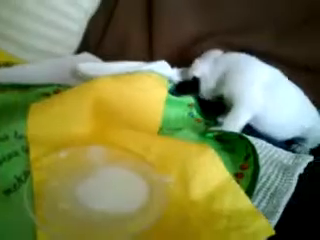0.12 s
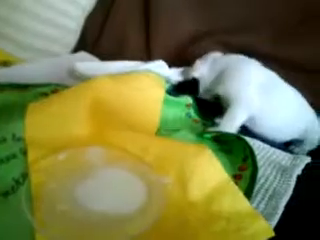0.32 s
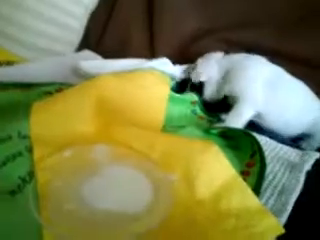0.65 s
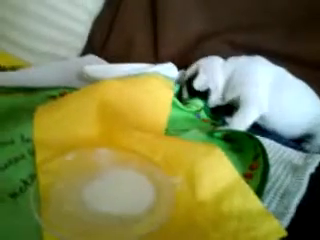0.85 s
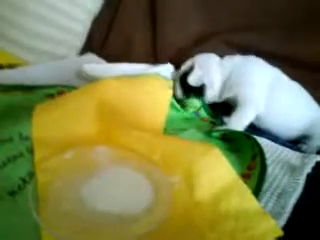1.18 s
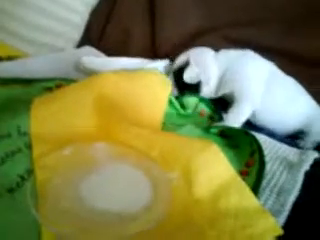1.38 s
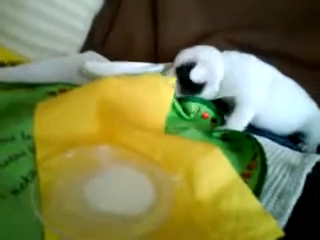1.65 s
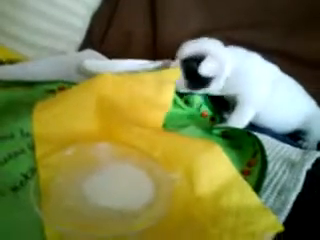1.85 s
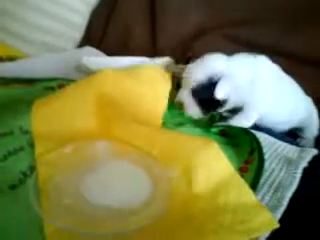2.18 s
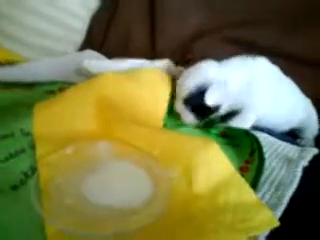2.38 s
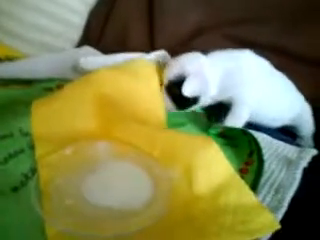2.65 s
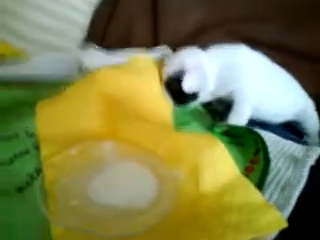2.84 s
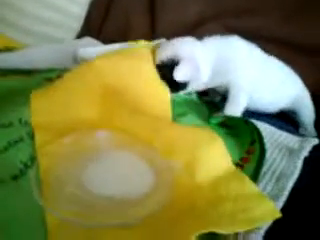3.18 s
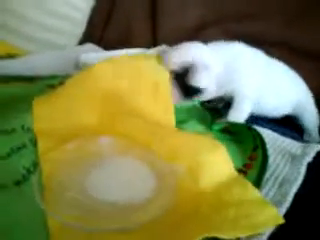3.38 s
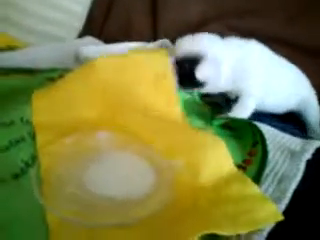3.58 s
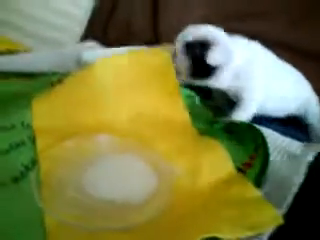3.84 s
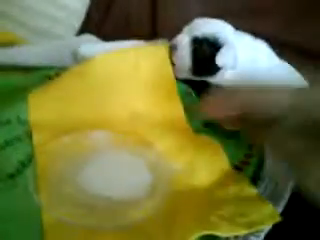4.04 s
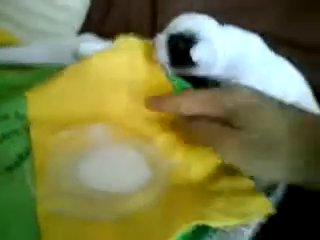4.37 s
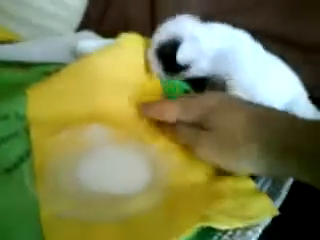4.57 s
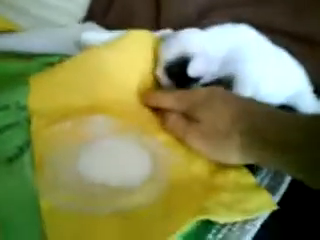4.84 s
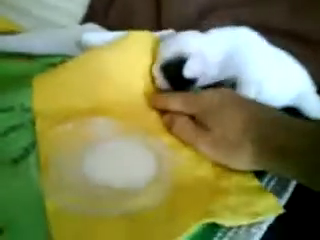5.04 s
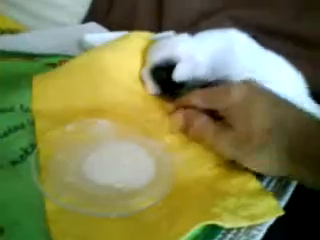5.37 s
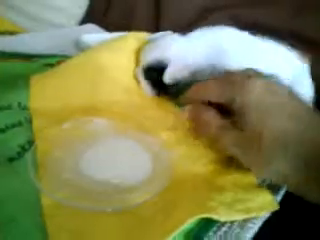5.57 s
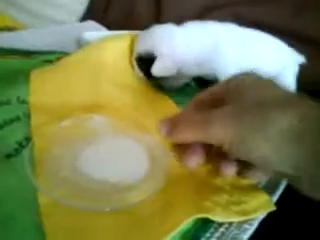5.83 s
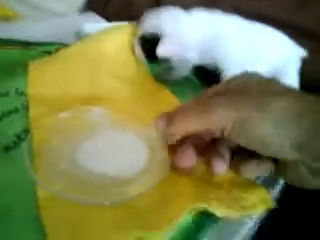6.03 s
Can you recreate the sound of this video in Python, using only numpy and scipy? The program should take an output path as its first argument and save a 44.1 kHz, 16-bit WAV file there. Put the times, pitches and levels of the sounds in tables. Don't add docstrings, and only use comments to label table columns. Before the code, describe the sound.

Close handling knocks, ticks and scrapes over soft room hiss, with a distant kitten's short squeal, trembling descending mew and faint whimpers.

```python
import sys
import numpy as np
from scipy import signal
from scipy.fft import rfft, irfft, next_fast_len
from scipy.io import wavfile
from scipy.ndimage import map_coordinates

SR = 44100
rng = np.random.default_rng(int(sys.argv[2]) if len(sys.argv) > 2 else 0)


def attenuation_scalar(level_db):
    decades = np.asarray(level_db, float) / 20
    return 10 ** decades


def digitize_waveform(pressure):
    field = np.atleast_2d(pressure).T
    bounded = np.clip(field, -1, 1)
    quanta = np.round(bounded * 32767).astype(np.int16)
    wavfile.write(sys.argv[1], SR, quanta)


N = 274081


def unit(x):
    return x / np.sqrt(np.mean(x ** 2) + 1e-20)


def along(points, hz):
    f, v = np.transpose(points)
    return np.interp(np.log(hz + 1), np.log(f + 1), v)


def curves(rows):
    s, *columns = np.transpose(rows)
    return [np.interp(np.arange(N) / SR, s, column) for column in columns]


def wobble(rate):
    knots = rng.standard_normal(int(N * rate / SR) + 4)
    return map_coordinates(knots, [np.arange(N) * rate / SR])


def filtered(x, response):
    m = next_fast_len(len(x) + 8192)
    return irfft(rfft(x, m) * response(np.fft.rfftfreq(m, 1 / SR)), m)[:len(x)]


def resonance(centre_hz, width_hz):
    return lambda f: 1j * f * width_hz / (centre_hz ** 2 - f * f + 1j * f * width_hz)


def noise(response):
    return unit(filtered(rng.standard_normal(N), response))


def add(track, s, sound):
    spot = track[round(s * SR):][:len(sound)]
    spot += sound[:len(spot)]


def swell(length, rise):
    return np.sin(np.pi * np.linspace(0, 1, round(length * SR)) ** rise)


def knocks(events, cycles, gain_db):
    out = np.zeros(N)
    t = np.arange(SR // 12) / SR
    for (s, db, hz), luck in zip(events, rng.standard_normal((len(events), 2))):
        u = t * hz / (cycles * attenuation_scalar(luck[0]))
        envelope = u * np.exp(1 - u)
        add(out, s, np.sign(luck[1]) * attenuation_scalar(db + gain_db) * envelope * np.sin(2 * np.pi * hz * t))
    return out


# (frequency [Hz], density [dB per Hz])
ROOM_TONE = [(12, -46), (20, 6), (57, -8), (150, -2.5), (620, -10.5), (1670, -13.5), (2430, -16),
             (6990, -21.5)]
# (time [s], level [dB])
CLOTH_STIR = [(0, -49.5), (.4, -54.5), (.9, -58.5), (1.3, -53.5), (1.7, -53.5), (2.2, -59.5), (2.8, -47.5),
              (3.3, -52.5), (3.8, -62.5), (4.3, -50.5), (4.8, -48.5), (5.1, -55), (5.4, -46.5),
              (5.7, -57.5), (6.21, -51.5)]


def air():
    stir_db, = curves(CLOTH_STIR)
    hiss = attenuation_scalar(-53.5 + 0.35 * wobble(18)) * noise(lambda f: attenuation_scalar(along(ROOM_TONE, np.minimum(f, 6800))))
    low = attenuation_scalar(stir_db - 4.0 + 1.5 * wobble(11)) * noise(resonance(330, 240))
    mid = attenuation_scalar(stir_db - 8.5 + 0.67 * wobble(11)) * noise(resonance(1300, 870))
    settling_db = -52 - 1.15 * np.arange(N) / SR
    rumble = attenuation_scalar(settling_db + 2.2 * wobble(2.7)) * noise(resonance(6.1, 37))
    return hiss + low + mid + rumble


# (time [s], length [s], level [dB], body ring [Hz], shell over body [dB])
SKIN_DRAGS = [(0.017, 0.03, -44.5, 673, -5.5), (.064, 0.031, -42, 590, -14),
              (0.155, 0.042, -38.5, 800, -44), (.23, 0.036, -39, 590, -11.5),
              (0.306, 0.056, -46.5, 800, -9), (.369, 0.029, -39, 587, -35), (.537, 0.0097, -38.5, 580, -15),
              (0.687, 0.061, -35, 760, -11.5), (0.843, 0.048, -33.5, 780, -16.5),
              (0.94, 0.026, -32.5, 760, -12), (1.076, 0.023, -36.5, 850, -12),
              (2.905, 0.013, -36, 900, -10.5), (2.963, 0.019, -34.5, 507, -37),
              (3.051, 0.011, -42, 684, -9.5), (3.29, 0.016, -39, 1300, -6),
              (3.31, 0.058, -35.5, 980, -14.5), (3.369, 0.15, -44, 960, -13), (3.477, 0.061, -32, 630, -16),
              (3.603, 0.075, -38, 510, -9.5), (3.714, 0.054, -46, 2400, 1), (4.131, .16, -60, 2520, 3),
              (5.064, 0.034, -50.5, 2030, -6), (5.357, 0.046, -52, 900, -21)]


def scuffs():
    out = np.zeros(N)
    for s, length, db, hz, bright_db in SKIN_DRAGS:
        shell_hz = 3080 + 0.32 * hz
        shape = swell(length, rise=0.88) ** .5
        n = len(shape)
        grip = np.repeat(rng.standard_normal(n), 40)[:n]
        slips = rng.standard_normal(n) * attenuation_scalar(3.96 * grip)
        body = unit(filtered(slips, lambda f: resonance(hz, 1.2 * hz)(f) / (1 + 1j * f / 2000) ** 2))
        shell = unit(filtered(slips, lambda f: resonance(shell_hz, .5 * shell_hz)(f) ** 2))
        add(out, s, attenuation_scalar(db) * shape * (body + attenuation_scalar(bright_db + 2.5) * shell))
    return out


# (frequency [Hz], time to fall 60 dB [s])
WALL_DECAY = [(300, 0.31), (1500, 0.5), (3000, 0.27), (7000, 0.34)]


def room(x):
    hz, t, z = signal.stft(rng.standard_normal(SR), SR, nperseg=256)
    decay = attenuation_scalar(-60 * t / along(WALL_DECAY, hz)[:, None])
    tail = signal.istft(z * decay, SR, nperseg=256)[1]
    delayed = np.pad(x, (300, 0))
    return signal.fftconvolve(delayed, tail / np.linalg.norm(tail))[:N]


# (time [s], peak level [dB])
CLAW_TICKS = [(.0219, -37), (.0284, -38), (.0581, -36), (.2236, -36), (.2277, -33.5), (.2862, -32.5),
              (.3026, -28), (.3642, -39), (.381, -41), (.5177, -42), (.7559, -35.5), (2.102, -24.5),
              (2.9139, -39), (2.9458, -30), (2.9488, -33), (3.077, -33.5), (3.0966, -31), (3.1124, -33),
              (3.2852, -30.5), (3.2947, -22), (3.2974, -28), (3.4036, -34.5), (3.5646, -23.5),
              (3.5816, -30.5), (3.6149, -32.5), (4.1528, -33), (4.5844, -38), (5.0835, -29), (.4883, -44),
              (5.3847, -34)]
# (mode [Hz], width [Hz], level [dB])
SHELL_MODES = [(2270, 490, -7.5), (3120, 200, 6.5), (4870, 550, 0), (6370, 190, 3.5)]


def ticks():
    edges = CLAW_TICKS + [(s, tick_db) for s, _, _, tick_db in HARD_SNAPS + RIM_CLICKS]
    scatter = np.exp(0.19 * rng.standard_normal(len(edges)))
    events = [(s, db, 3730 * spread) for (s, db), spread in zip(edges, scatter)]

    def shell(f):
        response = 0.81
        for k, (hz, width_hz, db) in enumerate(SHELL_MODES):
            response = response + (-1) ** k * attenuation_scalar(db) * resonance(hz, width_hz)(f)
        return response

    return filtered(knocks(events, cycles=0.13, gain_db=4.5), shell)


# (time [s], tap level [dB], ring [Hz], tick level [dB])
HARD_SNAPS = [(0.1375, -29, 480, -27.5), (.7625, -25, 727, -31), (0.928, -21, 800, -29),
              (0.9317, -17.5, 706, -24.5), (1.2279, -32, 485, -41.5), (2.0061, -30, 940, -30.5),
              (2.0092, -31, 770, -31), (2.1062, -19.5, 945, -24), (2.1502, -30.5, 860, -29),
              (2.4695, -23.5, 880, -24.5), (2.4799, -19.5, 820, -24), (2.578, -27, 800, -26),
              (2.5834, -28, 830, -26.5), (2.6154, -28, 980, -22.5), (2.619, -22, 770, -29.5),
              (2.6395, -21.5, 560, -18), (2.7833, -21.5, 550, -21.5), (2.9229, -23.5, 610, -23),
              (3.0436, -33, 840, -29.5), (3.2485, -24, 850, -23), (3.2507, -28, 855, -29),
              (3.2574, -19.5, 805, -24.5), (3.5707, -18, 430, -19), (3.659, -19, 460, -21),
              (4.581, -40, 420, -36)]
# (time [s], peak level [dB], ring [Hz])
DULL_TAPS = [(0.1559, -26, 550), (0.2331, -25, 610), (0.3757, -33.5, 680), (0.5345, -30.5, 624),
             (0.695, -6, 1110), (0.8464, -24, 367), (0.8771, -18.5, 590), (0.8795, -19.5, 880),
             (0.882, -22, 610), (0.8878, -18.5, 546), (1.4318, -38.5, 450), (1.5096, -19.5, 420),
             (1.5212, -33, 396), (2.1108, -25.5, 830), (2.4734, -22.5, 840), (2.9734, -23, 480),
             (3.1074, -36, 480), (3.3205, -25, 633), (3.6224, -23.5, 340), (5.9935, -36, 558),
             (5.197, -41, 1800)]


def taps():
    events = DULL_TAPS + [row[:3] for row in HARD_SNAPS]
    return filtered(knocks(events, cycles=0.32, gain_db=2), lambda f: 1 / (1 + 1j * f / 3200) ** 2)


# (time [s], peak level [dB], ring [Hz])
BODY_BUMPS = [(.2, -47, 50), (.35, -52, 60.6), (.5, -50, 39.7), (.698, -29.5, 92), (.87, -33.5, 112),
              (.889, -28, 92), (.963, -39, 54.7), (1.26, -59, 70.4), (3.61, -35.5, 81.7),
              (3.628, -23.5, 330), (3.66, -35, 72.2), (3.94, -44, 90.5), (4.58, -38, 190),
              (4.68, -45, 98.3), (4.84, -41, 165)]


def bumps():
    return knocks(BODY_BUMPS, cycles=0.34, gain_db=2)


# (time [s], length [s], level [dB], pitch [Hz], width [Hz])
WHIMPERS = [
    (1.323, 0.36, -58.5, 1930, 302),
    (1.55, 0.48, -64, 1910, 294),
    (2.5, 0.22, -48.5, 1850, 252),
    (2.516, 0.17, -46, 2240, 307),
    (3.188, 0.088, -46, 1863, 120),
    (4.431, 0.13, -55, 2000, 150),
    (4.619, 0.14, -54, 1990, 800),
    (4.753, 0.36, -57.5, 1970, 1200),
    (5.33, 0.17, -49.5, 1930, 600),
    (5.712, 0.029, -50, 1990, 800),
]


def peeps():
    out = np.zeros(N)
    for s, length, db, hz, width_hz in WHIMPERS:
        shape = swell(length, rise=0.47)
        fuzz = filtered(rng.standard_normal(len(shape)), lambda f: resonance(hz, width_hz)(f) ** 2)
        add(out, s, attenuation_scalar(db) * shape * unit(fuzz))
    return out


# (frequency [Hz], density [dB per Hz])
HOARSE_AIR = [(600, -60.5), (1200, -7), (2500, 6), (5000, -6), (9000, -3.5)]


def cry(rows, throat, jitter, rough, throb, throb_hz, breath_db):
    pitch, level_db, mouth = curves(rows)
    trembling = pitch * (1 + jitter * (wobble(40) + wobble(160)))
    phase = 2 * np.pi * np.cumsum(trembling) / SR
    beat = np.sin(2 * np.pi * np.cumsum(throb_hz * (1 + 0.2462 * wobble(30))) / SR)
    tone = np.zeros(N)
    for k in range(1, 12):
        partial_db = level_db + along(throat, k * pitch / mouth) + 4.5
        flutter = 1 + rough * np.sqrt(min(k, 3)) * wobble(240)
        flutter = flutter + (throb * beat if k <= 3 else .5 * rough * wobble(1100))
        tone += attenuation_scalar(partial_db) * unit(flutter) * np.sin(k * phase)
    breath = attenuation_scalar(level_db + breath_db) * noise(lambda f: attenuation_scalar(along(HOARSE_AIR, f)))
    tone += breath * (1 + np.cos(phase)) * (1 + throb * beat)
    t = np.arange(N) / SR
    return tone * np.clip(np.minimum(t - rows[0][0], rows[-1][0] - t) / 0.0023, 0, 1)


# (time [s], pitch [Hz], level [dB], mouth opening [resonance scale])
SQUEAL_PATH = [
    (2.6, 658, -36.5, 0.83),
    (2.645, 690, -27, 1.06),
    (2.672, 800, -30, 0.95),
    (2.692, 859.7, -15, 1.01),
    (2.732, 830.6, -17.5, .99),
    (2.76, 801, -28.5, 1.04),
    (2.79, 717, -37.5, 0.98),
    (2.85, 651, -36, 0.8),
    (2.96, 572, -43, 0.89),
]
# (frequency [Hz], level [dB])
SQUEAL_MOUTH = [(850, -25.5), (1250, -17), (1700, 0), (2500, -10.5), (3300, -31), (5000, -28),
                (6500, -42.5), (9000, -32.5)]


def squeal():
    return cry(SQUEAL_PATH, SQUEAL_MOUTH, jitter=.009, rough=.33, throb=.85, throb_hz=75, breath_db=-27)


# (time [s], pitch [Hz], level [dB], mouth opening [resonance scale])
MEW_PATH = [
    (3.525, 615, -28, 1.086),
    (3.6, 670.5, -30, 1.02),
    (3.7, 642, -31, 1.056),
    (3.8, 664.3, -29, 1.03),
    (3.9, 642.2, -32, 1.062),
    (4.09, 583, -37.5, 1.01),
    (4.17, 542, -35, 0.99),
    (4.26, 489.2, -38, 1),
    (4.38, 460, -52, 0.98),
]
# (frequency [Hz], level [dB])
MEW_MOUTH = [(480, -12.5), (650, -18.5), (1000, -17), (1350, 3.5), (1900, -13), (2300, -31.5),
             (4000, -35.5), (8000, -69)]


def mew():
    return cry(MEW_PATH, MEW_MOUTH, jitter=.013, rough=.36, throb=.45, throb_hz=55, breath_db=-29)


# (time [s], peak level [dB], ring [Hz], tick level [dB])
RIM_CLICKS = [
    (5.0726, -36, 1980, -25.5),
    (5.3883, -31.5, 2450, -27),
    (5.7147, -32, 2340, -29),
    (6.0143, -53, 2380, -22.5),
]


def rim():
    return knocks([row[:3] for row in RIM_CLICKS], cycles=1.0, gain_db=3.0)


def scene():
    voice = squeal() + mew() + peeps()
    kitten = attenuation_scalar(-2) * voice + attenuation_scalar(-5) * room(voice)
    hands = scuffs() + ticks() + taps() + bumps() + rim()
    return (kitten + hands + attenuation_scalar(-19.5) * room(hands) + air())[None]


def top_cut(x):
    return signal.sosfilt(signal.butter(12, 8280, fs=SR, output="sos"), x)


# (frequency [Hz], level [dB])
TREBLE_END = [(6800, 0), (7100, -6), (7350, -30), (8250, -30), (8500, -60)]
# (time [s], length [s], lowest lost [Hz], share lost [0-1])
TREBLE_GAPS = [
    (.7, .05, 5800, .7),
    (2.015, .075, 6300, .8),
    (2.114, .03, 4000, .97),
    (2.43, .035, 4000, .5),
    (2.54, .03, 4000, .5),
    (2.59, .022, 3500, .6),
    (2.645, .02, 5500, .8),
    (3.195, .05, 3800, .55),
]


def record(dry):
    x = filtered(dry[0], lambda f: attenuation_scalar(along(TREBLE_END, f)))
    for s, length, hz, share in TREBLE_GAPS:
        shape = swell(length, rise=1) ** 0.15
        piece = x[round(s * SR):][:len(shape)]
        add(x, s, -share * shape * filtered(piece, lambda f: f > hz))
    return top_cut(x[None])


dry = scene()
out = record(dry)
digitize_waveform(out)
```